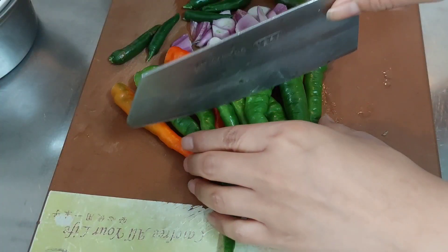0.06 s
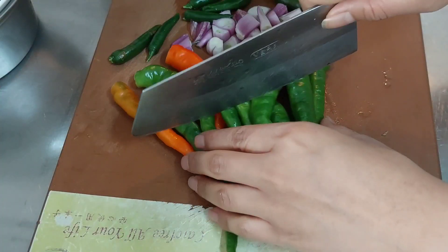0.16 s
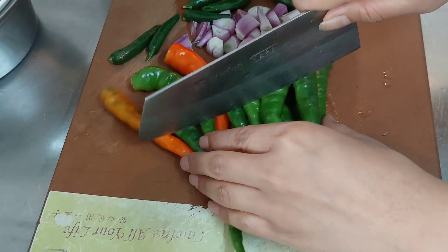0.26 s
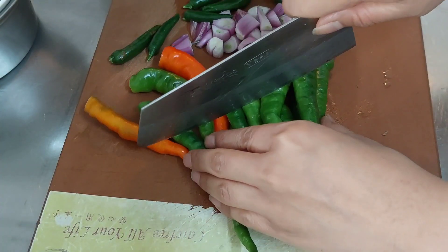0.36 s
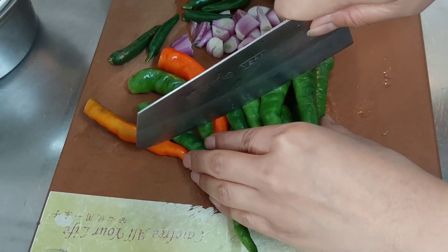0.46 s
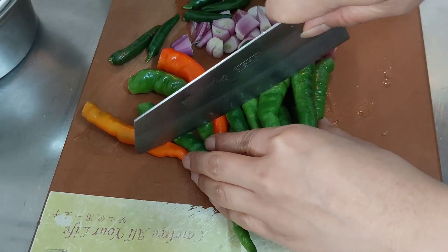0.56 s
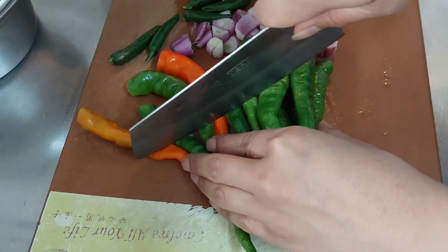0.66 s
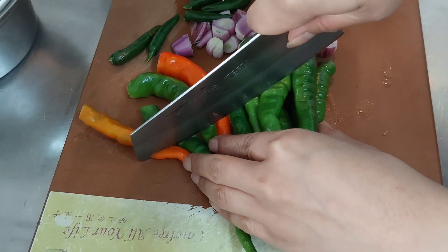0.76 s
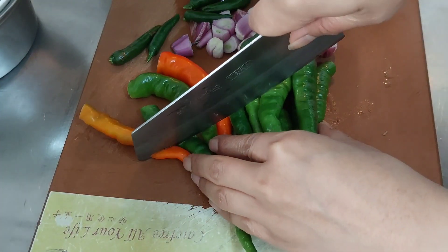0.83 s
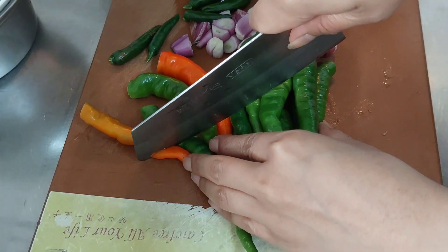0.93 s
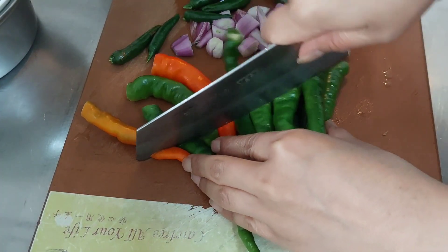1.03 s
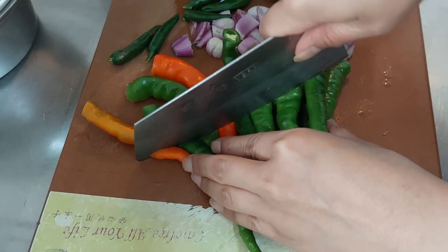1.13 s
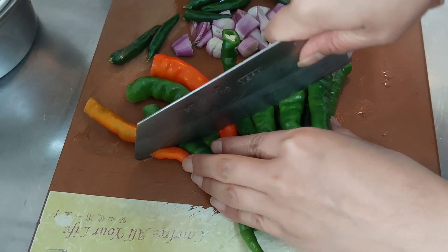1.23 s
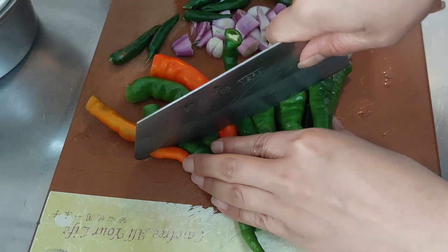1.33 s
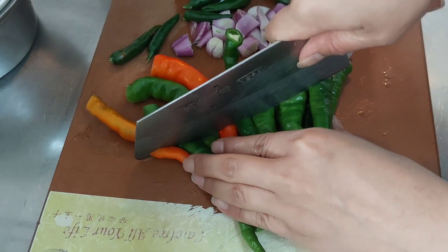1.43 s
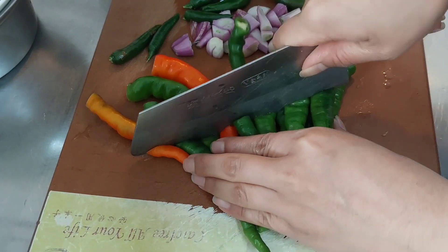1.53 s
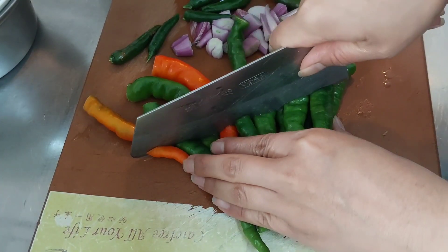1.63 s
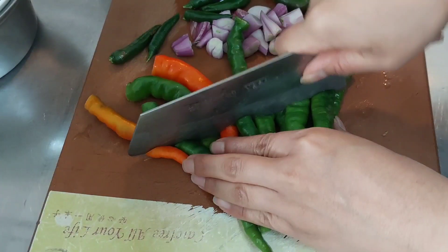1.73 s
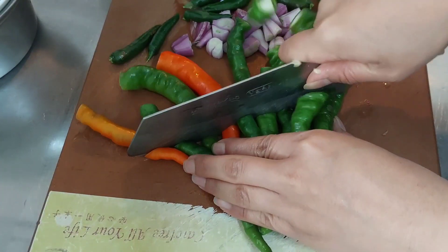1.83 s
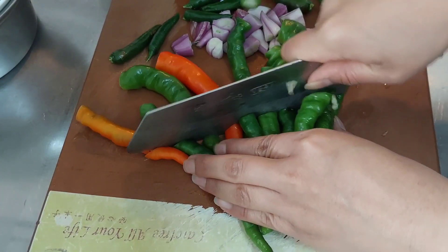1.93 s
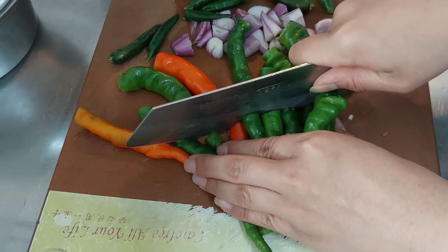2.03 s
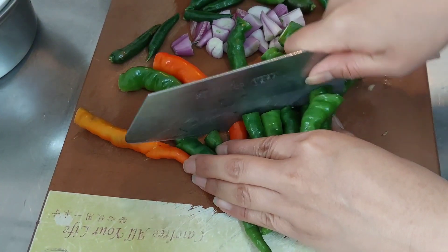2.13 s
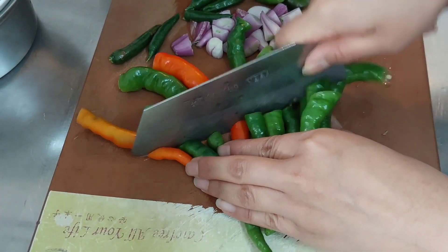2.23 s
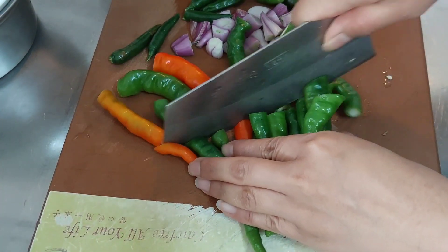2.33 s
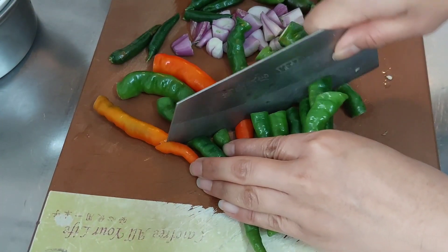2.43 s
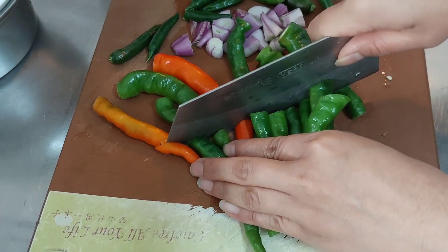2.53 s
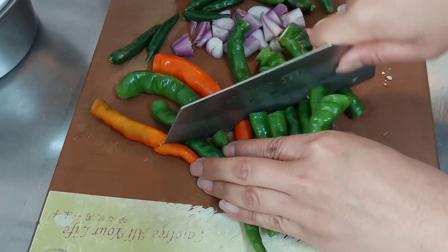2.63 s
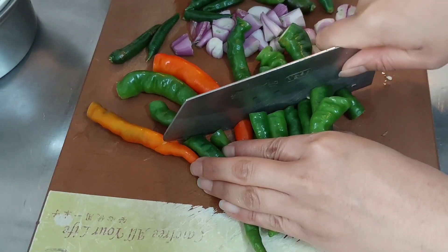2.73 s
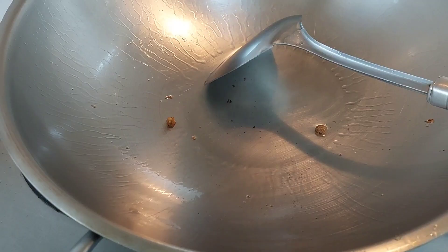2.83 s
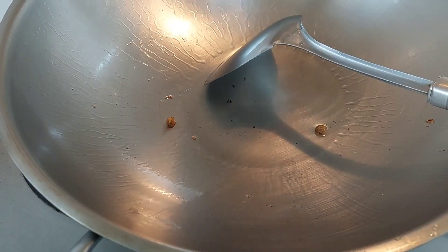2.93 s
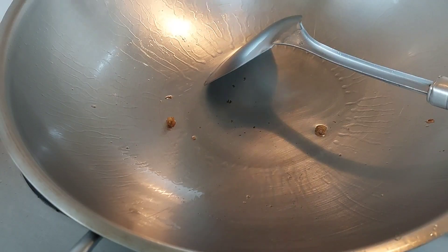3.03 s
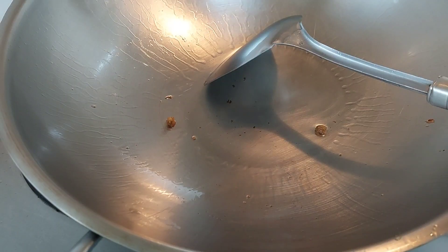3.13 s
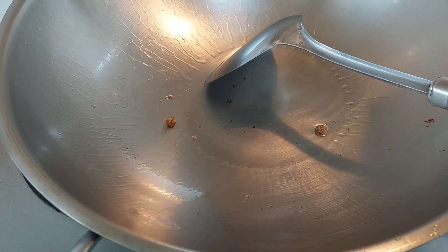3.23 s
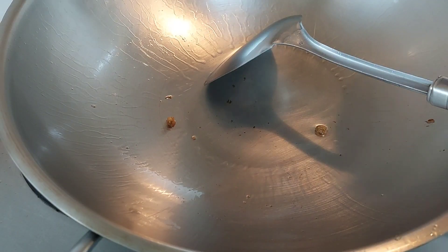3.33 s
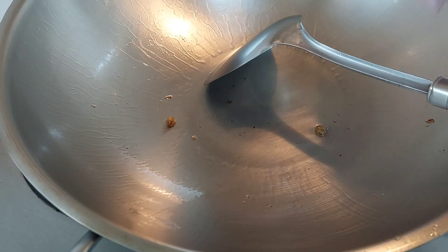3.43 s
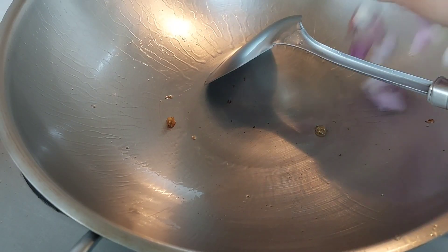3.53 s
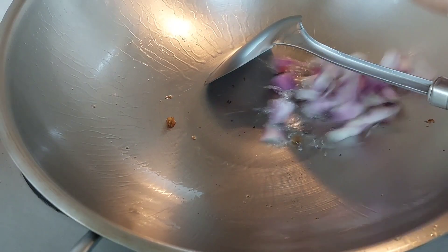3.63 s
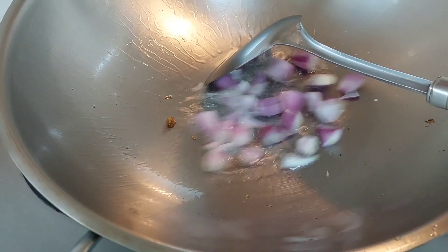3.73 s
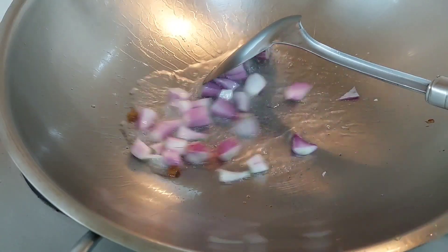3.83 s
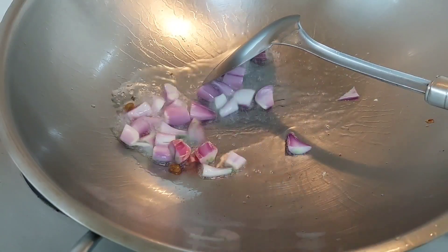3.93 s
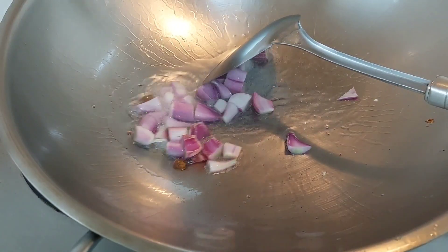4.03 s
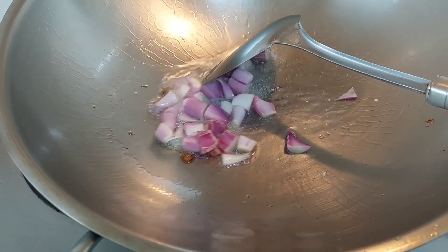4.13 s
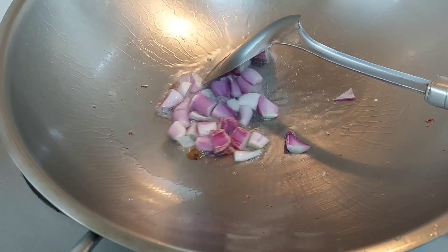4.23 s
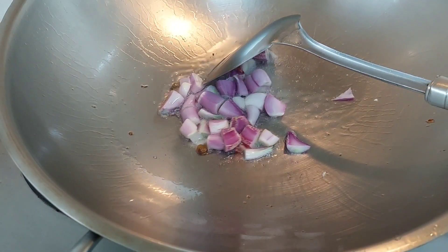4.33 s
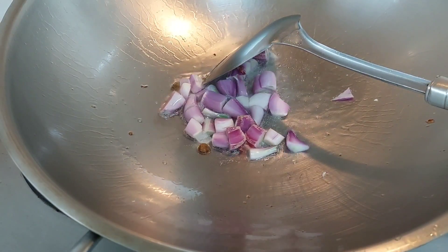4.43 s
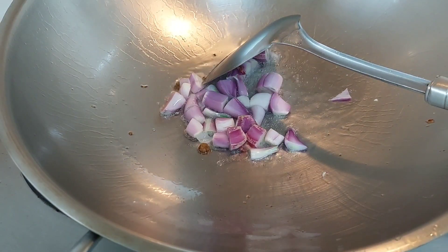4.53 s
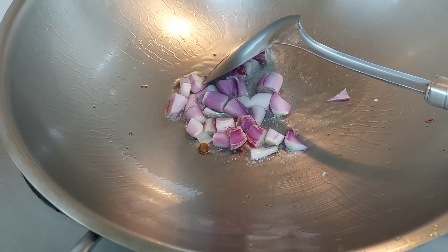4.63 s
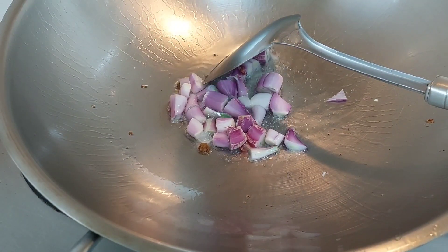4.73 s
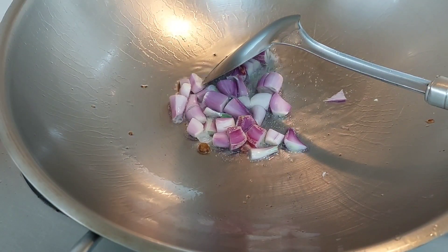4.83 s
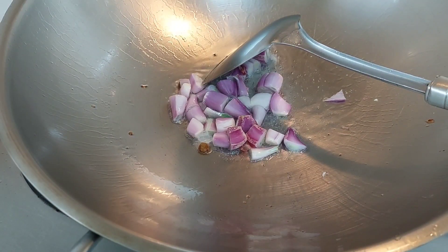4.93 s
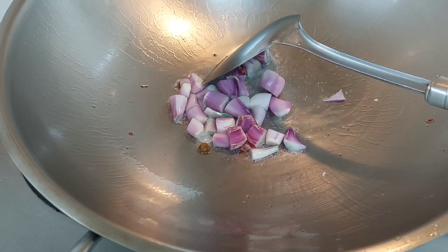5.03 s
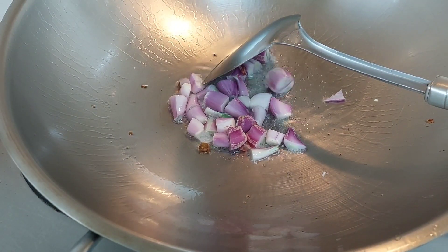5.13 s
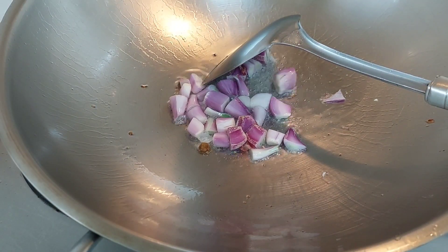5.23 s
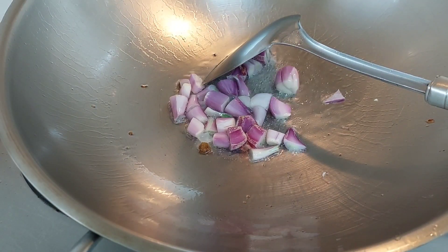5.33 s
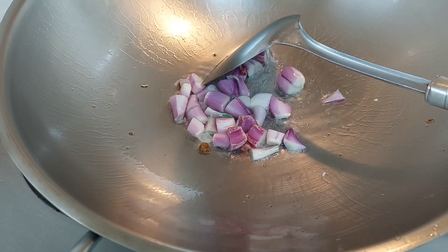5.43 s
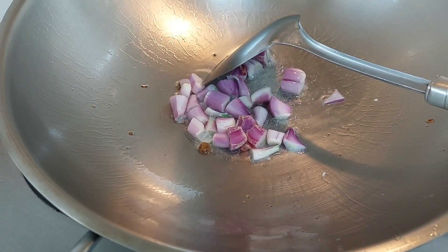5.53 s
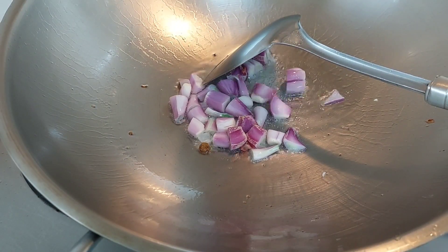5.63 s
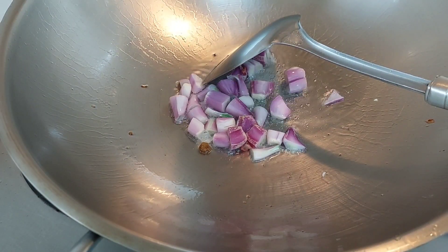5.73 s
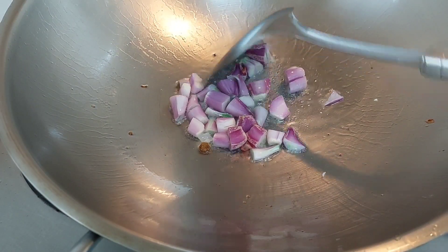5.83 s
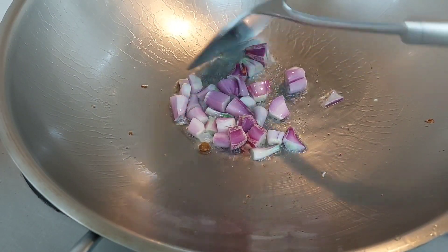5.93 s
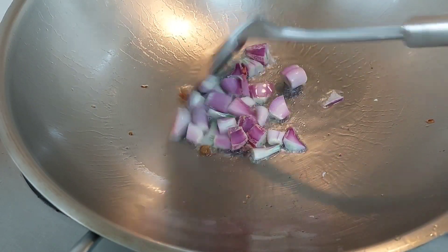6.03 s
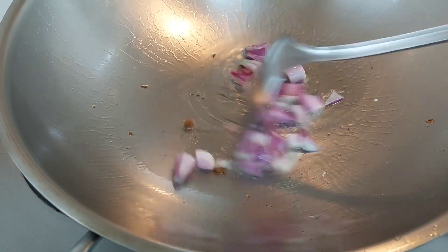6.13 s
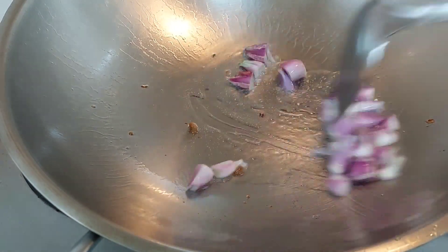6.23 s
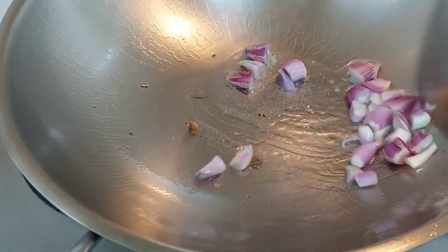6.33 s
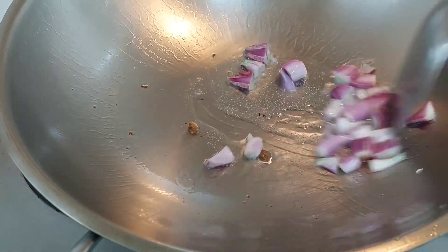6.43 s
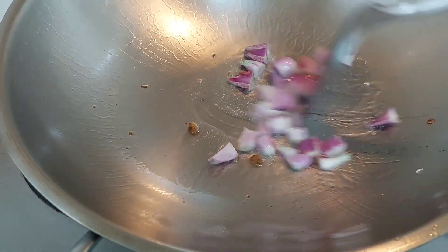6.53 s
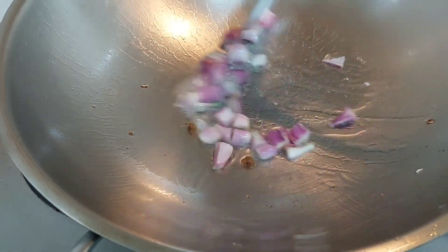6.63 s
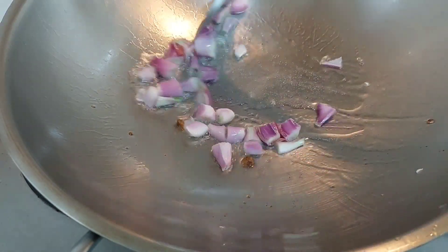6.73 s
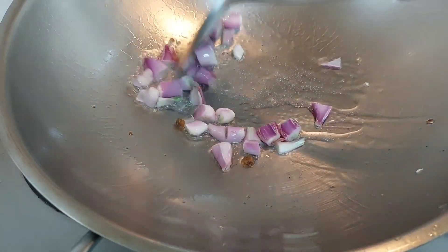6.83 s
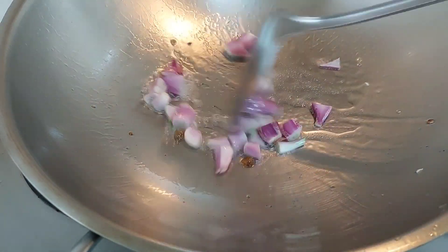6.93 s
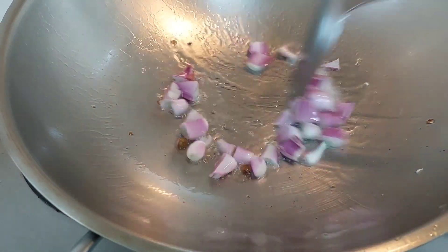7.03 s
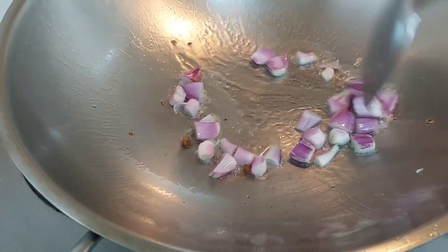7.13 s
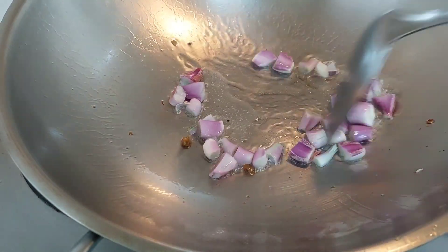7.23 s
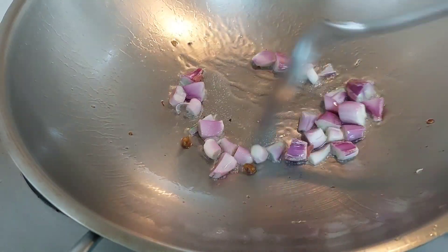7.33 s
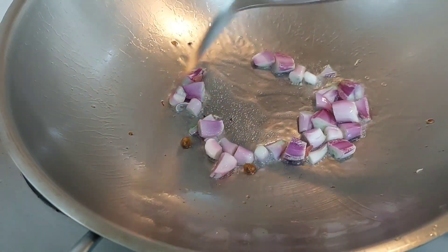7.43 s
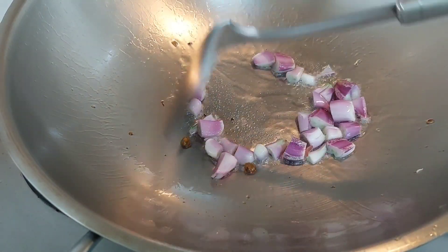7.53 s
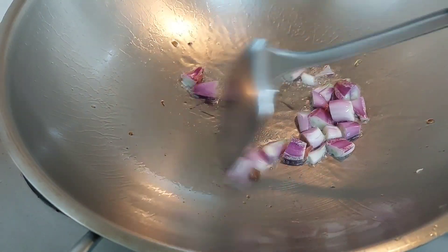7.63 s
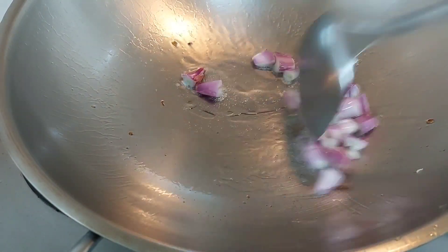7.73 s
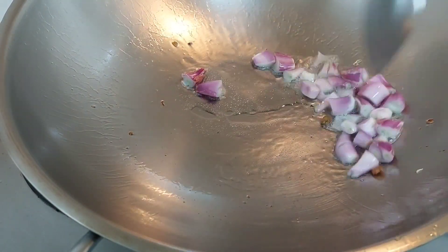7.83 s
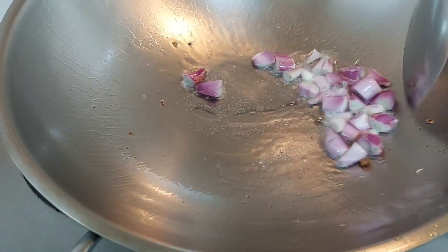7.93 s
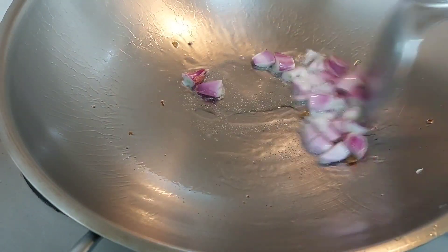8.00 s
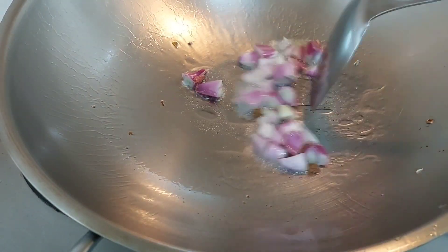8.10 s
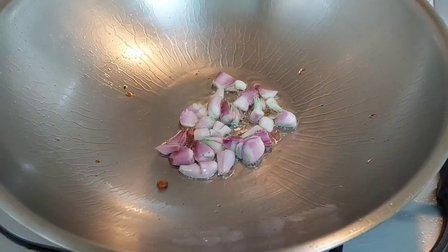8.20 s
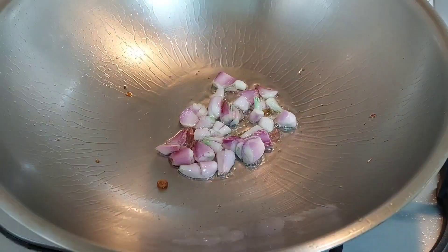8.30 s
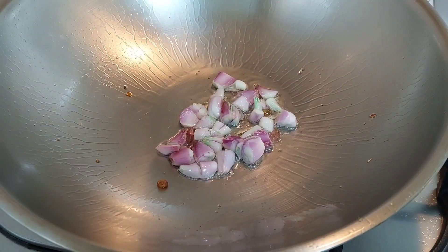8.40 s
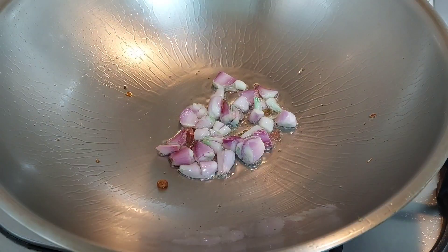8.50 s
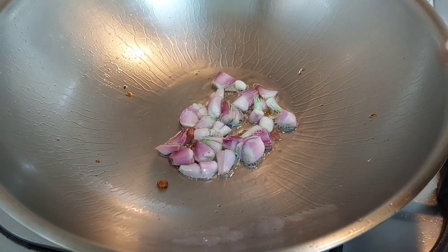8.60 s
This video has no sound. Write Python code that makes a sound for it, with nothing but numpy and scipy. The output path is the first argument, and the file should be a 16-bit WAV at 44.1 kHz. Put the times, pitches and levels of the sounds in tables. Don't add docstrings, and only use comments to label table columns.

```python
import sys
import numpy as np
from scipy import signal
from scipy.io import wavfile
from scipy.ndimage import uniform_filter1d

SR = 44100
rng = np.random.default_rng(int(sys.argv[2]) if len(sys.argv) > 2 else 0)


def log_audio(samples):
    frames = np.atleast_2d(samples).T
    limited = np.clip(frames, -1, 1)
    pcm = np.round(limited * 32767).astype(np.int16)
    wavfile.write(sys.argv[1], SR, pcm)


def gain_from_db(level_db):
    decades = np.asarray(level_db, float) / 20
    return 10 ** decades


N = 381906


def evened(x):
    return x / np.sqrt(np.mean(x ** 2) + 1e-20)


def add(mix, s, sound):
    part = mix[round(s * SR):][:len(sound)]
    part += sound[:len(part)]


def control(points, column=1):
    rows = np.array(points)
    return np.interp(np.arange(N) / SR, rows[:, 0], rows[:, column])


def swells(events, width_s, column):
    t = np.arange(0, N + 64, 64) / SR
    total = sum(row[column] * np.exp(-((t - row[0]) / width_s) ** 2 / 2) for row in events)
    return np.interp(np.arange(N) / SR, t, total)


def colour(x, points):
    hz = abs(np.fft.fftfreq(4096, 1 / SR))
    f, level_db = np.transpose(points)
    spectrum_db = np.interp(np.log(hz + 1), np.log(f), level_db)
    log_gain = np.log(gain_from_db(np.maximum(spectrum_db, -70)))
    taps = np.fft.ifft(np.exp(np.conj(signal.hilbert(log_gain)))).real[:2048]
    return evened(signal.oaconvolve(x, taps)[:N])


def resonate(x, hz, width_hz):
    r = np.exp(-np.pi * width_hz / SR)
    return evened(signal.lfilter([1, 0, -1], [1, -2 * r * np.cos(2 * np.pi * hz / SR), r * r], x))


def glide(x, hz, width_hz):
    turn = np.exp(2j * np.pi * np.cumsum(hz) / SR)
    r = np.exp(-np.pi * width_hz / SR)
    smoothed = signal.lfilter([1], np.convolve([1, -r], [1, -r]), x / turn)
    return evened((turn * smoothed).real)


def crowd(low_hz, high_hz, level_db, t60, count):
    jitter_hz = (high_hz - low_hz) / count * rng.uniform(-0.48, 0.42, count)
    hz = np.linspace(low_hz, high_hz, num=count) + jitter_hz
    return np.c_[hz, np.full(count, level_db), np.full(count, t60)]


def ring(modes, stretch, spread_db, seconds):
    chance = rng.standard_normal((len(modes), 2))
    hz, level_db, t60 = np.transpose(modes)[:, :, None]
    t = np.arange(round(seconds * SR)) / SR
    decay = np.exp(-t * np.log(1000) / stretch / np.clip(t60, .05, .5))
    waves = decay * np.sin(2 * np.pi * hz * t + 3 * chance[:, 1:])
    strength = gain_from_db(level_db[:, 0] + spread_db * chance[:, 0])
    sound = strength @ waves * np.minimum(t / 0.00042, 1)
    return sound / abs(sound[:1500]).max()


def bursts(per_s, spread_db, tail_s, hiss):
    size = gain_from_db(spread_db * np.minimum(rng.exponential(1, N), 4)) * (rng.random(N) < per_s / SR)
    envelope = signal.lfilter([1], [1, -np.exp(-1 / (tail_s * SR))], size)
    a, b = rng.standard_normal((2, N))
    clumped = envelope * a
    clumped /= np.sqrt(uniform_filter1d(clumped ** 2, 6000) + 1e-9)
    return clumped + hiss * b


def patchy(x, patch_db, bins, frames):
    z = signal.stft(x, nperseg=256)[2]
    field = uniform_filter1d(rng.standard_normal(z.shape), bins, 0)
    field = uniform_filter1d(field, frames, 1)
    return evened(signal.istft(z * gain_from_db(patch_db * evened(field)), nperseg=256)[1][:N])


def clicks(events, cycles, crack, puff, puff_s, boost_db, band_hz):
    tones, wide = np.zeros(N), np.zeros(N)
    t = np.arange(2000) / SR
    for s, peak_db, hz in events:
        peak = gain_from_db(peak_db + boost_db)
        add(tones, s, peak * np.sin(2 * np.pi * hz * t) * np.exp(-t * hz / cycles))
        spray = rng.standard_normal(2000) * (np.exp(-t / 0.00016) + puff * np.exp(-t / puff_s))
        add(wide, s, peak * crack * spray)
    band = signal.butter(2, band_hz, "bandpass", fs=SR, output="sos")
    return tones, signal.sosfilt(band, wide)


# f/Hz, t60/s
KITCHEN_T60 = [(250, 0.4), (660, 0.26), (1740, 0.39), (4590, 0.32)]


def room(x):
    taps = np.zeros(SR // 2)
    at = np.arange(120, SR // 2 - 20, 20)
    taps[at + rng.integers(0, 20, len(at))] = rng.choice([-1., 1.], len(at))
    hz, t, z = signal.stft(taps, SR, nperseg=128)
    t60 = np.clip(np.interp(hz, *np.transpose(KITCHEN_T60)), .1, .8)
    tail = signal.istft(z * gain_from_db(-60 * t / t60[:, None]), SR, nperseg=128)[1]
    return signal.fftconvolve(x, tail / np.linalg.norm(tail))[:N]


# t/s, level/dB
FAN_LEVEL = [(0, -64.5), (2.2, -51), (2.83, -62), (2.84, -65), (3.55, -63.5), (3.75, -45.5), (4.3, -59),
             (4.5, -49), (5.7, -56), (7.0, -47.5), (7.4, -43.5), (7.9, -61), (8.18, -43), (8.21, -71),
             (8.66, -67)]
# f/Hz, level/dB
AIR_SPECTRUM = [(15, -56.5), (25, -37), (49, 1.5), (86, -19), (123, -6), (261, -10), (854, -11.5),
                (1280, -24), (2650, -32.5), (2950, -25.5), (3470, -31.5), (15700, -43.5)]
# t/s, level/dB
AIR_LEVEL = [(0, -66), (.7, -58.5), (2.84, -61), (3.3, -63), (3.7, -60.5), (8.18, -49), (8.2, -64.5),
             (8.66, -66.5)]
# t/s, level/dB
WHINE_SWELL = [(0, -12), (.35, -4), (.55, 7), (.8, -10), (2.6, -5.5), (2.9, 3), (3.6, 0)]
# t/s, rumble swell level/dB, hum swell level/dB
LEANS = [
    (4.66, 10.5, 1),
    (4.92, 8, 12.5),
    (5.08, 3, 14.5),
    (5.25, 5, 6),
    (5.45, 2, 14),
]


def fan():
    rumble_hz, hum_hz, whine_hz, whine_db = 58.4, 114, 2895, -77.5
    lean_s = 0.066
    a, b, c, d = rng.standard_normal((4, N))
    t = np.arange(N) / SR
    rumble = resonate(resonate(a, rumble_hz, 28), rumble_hz, 35)
    waver = resonate(resonate(b, 108, 30), 108, 30)
    hum = evened(np.sin(2 * np.pi * hum_hz * t) + .4 * waver)
    air = gain_from_db(control(AIR_LEVEL)) * colour(c, AIR_SPECTRUM)

    drift, swell, other = (np.interp(t, np.arange(90) / 10, v) for v in rng.standard_normal((3, 90)))
    whine_level_db = whine_db + control(WHINE_SWELL)
    whine = gain_from_db(whine_level_db + 4.5 * swell) * glide(d, whine_hz + 60 * drift, 90)
    whine += gain_from_db(whine_level_db - 5 + 4 * other) * glide(d, 1.08 * whine_hz + 35 * other, 90)

    fan_db = control(FAN_LEVEL)
    rumble_db = fan_db + swells(LEANS, lean_s, column=1)
    hum_db = -21 + 0.67 * fan_db + swells(LEANS, lean_s, column=2)
    return gain_from_db(rumble_db) * rumble + gain_from_db(hum_db) * hum + air + whine


# f/Hz, level/dB, t60/s
BOARD_MODES = [(207.6, -0.5, 0.27), (339, -1, 0.56), (426, -4, 0.11), (514, -5.5, 0.3), (575, -3.5, 0.6),
               (634, -13, 0.44), (785, -2.5, 0.27), (875, -19, 0.34), (1043, -17.5, 0.2),
               (1260, -27.5, 0.3), (1490, -13, 0.11)]
# f/Hz, level/dB, t60/s
TABLE_MODES = [(60.4, 5.5, 0.39), (101.8, 1, 0.53)]
# t/s, peak level/dB, table thump level/dB, colour centre f/Hz
BLOWS = [(0.786, -9.5, -19, 750), (0.794, -5.5, -12, 540), (0.829, -9.5, -21, 560),
         (1.164, -15, -40.5, 650), (1.178, -17, -29, 420), (1.6, -18, -17, 404), (1.616, -30, -39.5, 450),
         (1.863, -5, -19, 447), (1.873, -12, -31, 700), (1.889, -11, -18, 650), (2.065, -21, -23, 496),
         (2.732, -39, -27, 400), (2.76, -31, -24, 400), (5.128, -19.5, -45, 800), (5.161, -19, -37, 600),
         (5.197, -45, -24, 500), (5.246, -38, -18.5, 500), (5.294, -15, -46.5, 850), (5.303, -16, -46, 450)]


def blows():
    colour_octaves = 0.79
    out = np.zeros(N)
    modes = np.r_[np.array(BOARD_MODES),
                  crowd(170, 330, -3, .35, count=5),
                  crowd(380, 700, -6, .4, count=12),
                  crowd(700, 1150, -9, .15, count=8)]
    for s, peak_db, thump_db, centre_hz in BLOWS:
        near_db = np.maximum(-6 * (np.log2(modes[:, 0] / centre_hz) / colour_octaves) ** 2, -6)
        coloured = modes + np.outer(near_db, [0, 1, 0])
        add(out, s, gain_from_db(peak_db - 8.5) * ring(coloured, 0.3, 0.55, .3))
        add(out, s, gain_from_db(thump_db - 5.5) * ring(TABLE_MODES, 0.46, 1.5, .4))
    return out


# start t/s, push t/s, crunch level at full push/dB, board buzz level over crunch/dB
STROKES = [(.43, 0.0193, -74, 16), (0.599, 0.17, -50.5, -4.5), (0.784, 0.0096, -32, 4.5),
           (1.062, .02, -54, -8), (1.085, 0.023, -40, 1.5), (1.131, 0.051, -29.5, -5.5),
           (1.29, .05, -49, -1), (1.342, 0.042, -37, -4), (1.565, 0.055, -27, -0.5),
           (1.689, 0.027, -42.5, 3.5), (1.783, 0.028, -32, 1.5), (1.831, 0.046, -18, 1),
           (2.02, 0.041, -25.5, 2), (2.18, 0.1702, -50.5, 11), (2.359, 0.077, -51.5, 7),
           (2.51, 0.045, -56.5, -7), (2.71, 0.042, -27, -0.5), (2.769, 0.013, -32, -0.5)]


def pressure(fall_db_per_s, buzz):
    bite_db, bite_s = -11.5, 0.0014
    tail_db, tail_fall_db_per_s = -6, 171.5
    power = np.zeros(N)
    t = np.arange(SR // 2) / SR
    for s, push_s, level_db, board_db in STROKES:
        after = np.maximum(t - push_s, 0)
        rise = np.minimum(t / bite_s, 1) * gain_from_db(bite_db * np.maximum(1 - t / push_s, 0))
        fall = gain_from_db(-fall_db_per_s * after) + gain_from_db(tail_db - tail_fall_db_per_s * after)
        add(power, s, (gain_from_db(level_db + board_db * buzz) * rise * fall) ** 2)
    return np.sqrt(power) * (np.arange(N) < SHOTS[1][0] * SR)


# f/Hz, level/dB
SKIN_SPECTRUM = [(530, -24), (900, 1.5), (2340, -21.5), (3010, -3), (5100, -9.5), (6480, -7.5),
                 (7660, -10.5), (14300, -16), (15700, -36.5)]


def crunch():
    cells = bursts(per_s=300, spread_db=0.0, tail_s=0.0026, hiss=0.89)
    skins = patchy(colour(cells, SKIN_SPECTRUM), 1.17, bins=6, frames=6)
    tearing = bursts(per_s=220, spread_db=6.0, tail_s=0.0038, hiss=1.0)
    board = evened(sum(gain_from_db(0.5 * db) * resonate(tearing, hz, 120) for hz, db, _ in BOARD_MODES))
    return (gain_from_db(-8.0) * pressure(454.5, buzz=False) * skins
            + gain_from_db(-7.5) * pressure(256, buzz=True) * board)


# t/s, peak level/dB, ring f/Hz
SNAPS = [(0.4454, -43.5, 2980), (0.7178, -49, 3570), (0.7876, -23, 3660), (1.0824, -27, 6000),
         (1.0904, -21, 6100), (1.1184, -18.5, 5600), (1.1372, -22, 5380), (1.1585, -32, 5900),
         (1.1732, -13, 3320), (1.342, -17.5, 4120), (1.366, -23.5, 7100), (1.3902, -18, 6400),
         (1.5635, -29.5, 3180), (1.5881, -10.5, 6700), (1.6158, -25.5, 2960), (1.711, -31, 3780),
         (1.7835, -23, 6300), (1.8088, -5.5, 6860), (1.864, -13.5, 3000), (1.875, -7.5, 4040),
         (1.8895, -10.5, 3300), (2.0218, -30, 2070), (2.0647, -11.5, 6700), (2.2914, -32, 3360),
         (2.381, -31, 3780), (2.5074, -45, 3500), (2.567, -42, 6550), (2.5403, -36.5, 3200),
         (2.5544, -41, 3100), (2.6896, -38.5, 3120), (2.7095, -28, 3330), (2.734, -12, 3540)]


def snaps():
    return clicks(SNAPS, cycles=5.2, crack=0.69, puff=0.37, puff_s=0.0044, boost_db=-6.5,
                  band_hz=[2600, 14500])


# f/Hz, level/dB, t60/s
WOK_MODES = [(485, -8, .2), (1292, -7, .25), (1567, -10, .2), (2112, -6, .3), (3052, 3, .3),
             (3797, -1, .27), (3989, 1, .25), (4764, -5, .2), (5139, -1, .2), (5398, 0, .26),
             (5809, -3, .15), (6900, -3, .26), (8816, -1, .3), (10627, 3, .25)]
# f/Hz, level/dB, t60/s
BOTTOM_MODES = [(478, 1, 0.15), (548, -0.5, 0.14), (625, 1, .13), (800, -1, .15), (920, -7, .12),
                (1179, -0.5, 0.24), (1270, -9, .2), (2020, -19, 0.26)]
# f/Hz, level/dB, t60/s
BLADE_MODES = [(1262, -3, .22), (1356, -1, 0.2), (1560, -2, .2), (1710, -9, .2), (1888, -4, 0.16),
               (2287, -12, .18), (3260, -3, .12), (3819, -6, .1), (4650, -7, .18), (5280, -7, .18),
               (8400, -9, .15), (10550, -2, .17)]
# f/Hz, level/dB, t60/s
WALL_MODES = [(230, -17.5, 0.14), (520, -7.5, 0.16), (1295, -9, 0.28), (1610, -5, 0.11), (2090, -1, 0.17),
              (3020, -5, .1), (3860, 6, .1), (4764, -2, 0.18), (5150, -5, .1), (6200, -9, 0.16),
              (7050, -6, 0.089), (10600, -5, .07)]
# t/s, peak level/dB, ring time factor
DROPS = [
    (3.616, -48, 0.6),
    (3.648, -28.5, 0.74),
    (3.672, -32, 0.86),
    (3.702, -27, 0.62),
    (3.735, -38, 0.8),
]
# t/s, peak level/dB, ring time factor
BLADE_HITS = [
    (6.5716, -17, .6),
    (7.0461, -12, 0.59),
]
# t/s, peak level/dB, ring time factor
WALL_HITS = [
    (7.696, -8, 0.92),
]
# t/s, peak level/dB, ring time factor
RIM_HITS = [
    (8.0655, -11, .55),
    (8.0718, -7, .6),
]


def clangs():
    out = np.zeros(N)
    parts = ((BOTTOM_MODES, DROPS), (BLADE_MODES, BLADE_HITS), (WALL_MODES, WALL_HITS), (WOK_MODES, RIM_HITS))
    for modes, hits in parts:
        for s, peak_db, stretch in hits:
            add(out, s, gain_from_db(peak_db) * ring(modes, stretch, 1.5, .3))
    return out


# t/s, peak level/dB, colour centre f/Hz, colour width/octaves, contact t/s
SCRAPES = [(5.732, -27, 2180, .7, 0.011), (5.772, -27, 3600, 0.23, 0.0087), (5.81, -33, 1400, 0.43, 0.006),
           (6.03, -25, 3940, .17, 0.013), (6.107, -20, 3370, 0.15, 0.03), (6.12, -22, 4430, 0.11, 0.03),
           (5.961, -37.5, 500.5, 0.193, 0.025), (6.105, -34.5, 498, 0.22, 0.025),
           (6.109, -22, 2205, .9, 0.043), (6.575, -10.5, 5270, 0.94, 0.0098),
           (7.046, -12.5, 1600, 0.45, 0.0074)]
# t/s, peak level/dB, colour centre f/Hz, colour width/octaves, ring time factor
KNOCKS = [(5.632, -20, 993, 2.9, 0.54), (5.632, -21.5, 3600, .37, 0.33), (6.572, -14, 1460, 0.42, 0.78),
          (6.572, -21, 3110, 0.6, 0.27), (6.758, -17.5, 2800, 0.94, 0.97), (6.966, -17.5, 4000, 0.77, 0.31),
          (7.047, -12, 3800, .99, 0.606), (7.173, -17.5, 1510, 2.3, 0.61), (7.546, -14, 3498, 4.1, 0.45),
          (7.695, -14, 685, 0.8, 0.32), (7.695, -6.5, 2120, 1.11, 0.53), (7.696, -5, 7140, 3.94, 0.61),
          (7.885, -19, 2470, 0.4, 0.59), (8.065, -9, 1501, 1.08, 0.67), (8.067, -3.5, 3715, 0.82, 0.68),
          (8.07, -6.5, 9374, .8, 0.6), (6.572, -28.5, 502, 0.54, 0.78)]
# t/s, peak level/dB, colour centre f/Hz, colour width/octaves, ring time factor
TICKS = [(5.2935, -18, 930, .7, 0.43), (5.129, -22.5, 930, 0.63, 0.33), (3.808, -16, 2300, 0.57, 0.33),
         (3.8675, -11, 2600, 0.37, .5), (3.884, -12, 1930, 0.37, .4), (4.562, -16.5, 3360, 0.42, 0.45),
         (7.325, -24, 3700, 0.42, .25), (7.573, -22, 3000, 0.35, 0.28), (7.654, -21, 4000, .5, .25),
         (5.001, -15, 4900, 0.47, 0.24), (4.438, -18, 925, 1.153, 0.61), (6.281, -16, 1130, 0.98, 0.63),
         (6.512, -28, 3960, 0.59, 0.2), (6.842, -10.5, 3550, 0.25, 0.16), (7.111, -17, 1000, 1.55, 0.207)]


def spatula():
    scrape_ring, knock_s, tick_s = 0.42, 0.0054, 0.0011
    known = np.array(WOK_MODES) * [1, .6, 1] + [0, 1.5, 0]
    dense = crowd(451, 13500, -0.4, 0.11, count=170)
    out = np.zeros(N)
    t = np.arange(3500) / SR
    touches = [(*row, scrape_ring) for row in SCRAPES]
    touches += [(*row[:-1], knock_s, row[-1]) for row in KNOCKS]
    touches += [(*row[:-1], tick_s, row[-1]) for row in TICKS]
    for s, peak_db, centre_hz, octaves, contact_s, stretch in touches:
        modes = np.r_[known + [0, 30 * (min(stretch, 1.1) - .95), 0], dense]
        near_db = -6 * (np.log2(modes[:, 0] / centre_hz) / max(octaves, .1)) ** 2
        modes = (modes + np.outer(near_db, [0, 1, 0]))[near_db > -30]
        rise_s = 0.00044 + 25 * contact_s ** 2
        envelope = np.minimum(t / rise_s, 1) * np.exp(-(t / contact_s) ** 1.34 / 2)
        contact = rng.standard_normal(len(t)) * envelope
        contact[0] = np.linalg.norm(contact) * 1.73 * min(knock_s / contact_s, 1) ** 2
        knock = signal.fftconvolve(ring(modes, stretch, 1.5, .2), contact)
        loud_part = knock[:round((.004 + 2 * contact_s) * SR)]
        add(out, s, gain_from_db(peak_db - 0.5) * knock / (3 * np.std(loud_part)))
    return out


# t/s, level/dB, resonance f/Hz
JET = [
    (3.5, -83, 6310),
    (3.58, -63, 6500),
    (3.64, -69, 6500),
    (3.742, -25.5, 6840),
    (3.95, -20.5, 7774),
    (4.15, -25, 8100),
    (4.5, -39, 8530),
]


def jet():
    s, level_db, hz = np.transpose(JET)
    t = np.arange(N) / SR
    hiss = bursts(per_s=300, spread_db=2.5, tail_s=.004, hiss=1.1)
    jet_db = np.interp(t, s, level_db, left=-200, right=-200)
    return gain_from_db(jet_db) * glide(hiss, np.interp(t, s, hz), 2800)


# t/s, peak level/dB, pitch f/Hz
SPITS = [(3.704, -7, 9200), (3.866, 3, 9960), (3.9248, 11, 7470), (3.9484, 10, 7600), (3.9523, 6, 9690),
         (4.0216, 17, 7790), (4.045, 2, 8140), (4.1165, -3, 7820), (4.1584, -7, 8220), (4.167, 1, 8110),
         (4.1964, -10, 8300), (4.2437, 0, 8120), (4.2657, -1, 10300), (4.339, -9, 12600),
         (4.4383, -5, 12200), (4.5674, -18, 10900), (4.744, -5, 10200), (5.0484, -14, 12300),
         (5.2989, -16, 10300), (5.4184, -13, 9790), (5.7514, -8, 7310), (5.7995, -8, 8690),
         (5.9095, -16, 13300), (5.9644, -2, 6100), (6.0487, -9, 9820), (6.161, 3, 10900),
         (6.2404, -5, 5750), (6.3727, 1, 13200), (6.461, 1, 11000), (6.7526, -14, 12400),
         (6.8134, -1, 13000), (6.9356, -14, 10900), (6.9663, -9, 9470), (7.1748, -12, 10900),
         (7.2986, 3, 11000), (7.3007, -11, 10400), (7.3914, -10, 11700), (7.466, -3, 12200),
         (7.549, 5, 10900), (7.5545, 5, 9430), (7.784, -9, 11000), (7.784, -12, 13400), (7.9348, -17, 8120),
         (7.9738, 5, 11700), (8.0534, -13, 6900), (8.1653, 3, 11400), (8.1754, -6, 9200)]


def spits():
    return clicks(SPITS, cycles=3.1, crack=.8, puff=1.2, puff_s=.004, boost_db=-15.5,
                  band_hz=[7000, 14500])


# f/Hz, level/dB
FIZZ_SPECTRUM = [(2350, -41), (4000, -5.5), (6470, 1), (10300, 7), (12600, 4.5), (14500, 3.5), (15300, -13),
                 (15700, -58)]
# f/Hz, level/dB
BUBBLE_SPECTRUM = [(710, -40), (1200, -8), (1560, -1), (1740, -2.5), (6000, -3), (7800, -18), (13200, -120)]
# f/Hz, level/dB
BODY_SPECTRUM = [(150, -54), (250, -16.5), (562, -0.5), (668, -4), (795, 0), (2000, -7.5), (2600, -20.5),
                 (4400, -120)]
# t/s, level/dB
BOIL = [(3.45, -82), (3.644, -69.5), (3.652, -51), (3.72, -37.5), (3.8, -19.5), (4.0, -18.5), (4.3, -22),
        (4.7, -25.5), (5.1, -27.5), (5.6, -30), (5.95, -33.5), (6.3, -30), (6.9, -25.5), (7.6, -28.5),
        (8.18, -29.5), (8.21, -51.5), (8.3, -57), (8.66, -55.5)]
# t/s, fizz surge level/dB, drag on the steel level/dB
TURNS = [(3.655, -1.5, 16.5), (4.85, 0, -2), (5.0, -3, -0.5), (5.3, -2, 3), (5.42, 3, -1.5), (5.65, 2, 0.5),
         (6.08, 0.5, 6.5), (6.2, 4, 3), (6.4, 3.5, 4.5), (6.8, 3, 8.5), (6.95, 2, -1.5), (7.03, 2, 9),
         (7.15, 3, 2), (7.35, 1.5, 5.5), (7.8, 1, 7.5), (8.12, 2.5, 10.5), (8.54, 5, 10)]


def frying():
    turn_s = 0.059
    splash_s, splash_top_db, splash_fall_db_per_s = 3.89, 4, 11.5
    steam = bursts(per_s=450, spread_db=2.2, tail_s=0.002, hiss=1.3)
    drops = bursts(per_s=560, spread_db=-1.5, tail_s=0.0011, hiss=1.0) + 0.38 * steam
    fizz = patchy(colour(steam, FIZZ_SPECTRUM), 1.8, bins=10, frames=8)
    bubbles = patchy(colour(drops, BUBBLE_SPECTRUM), 1.8, bins=4, frames=12)
    steel = evened(sum(resonate(drops, hz, 62) for hz, _, _ in WOK_MODES if hz < 6000))
    drumming = bursts(per_s=150, spread_db=3.0, tail_s=0.0039, hiss=1.0) + 0.33 * drops
    body = colour(drumming, BODY_SPECTRUM)

    boil_db = control(BOIL)
    above_db = boil_db + 25
    surge_db = swells(TURNS, turn_s, column=1)
    drag_db = swells(TURNS, turn_s, column=2)
    from_splash_s = abs(np.arange(N) / SR - splash_s)
    splash_db = np.maximum(splash_top_db - splash_fall_db_per_s * from_splash_s, 0)
    return (gain_from_db(boil_db + surge_db) * fizz
            + gain_from_db(-30 + above_db + 0.095 * drag_db) * evened(bubbles + 0.12 * steel)
            + gain_from_db(-42 + above_db + drag_db + splash_db) * body)


def scene():
    beds = crunch() + frying() + jet() + fan()
    snap_tones, snap_cracks = snaps()
    spit_tones, spit_cracks = spits()
    knocks = blows()
    steel = clangs() + spatula()
    to_room = (snap_tones + spit_tones) / 8 + gain_from_db(-1.5) * snap_cracks + gain_from_db(-2.5) * spit_cracks
    to_room += gain_from_db(-3.5) * knocks + gain_from_db(-1.5) * steel
    direct = snap_tones + snap_cracks + spit_tones + spit_cracks + knocks + steel
    return direct + room(to_room), beds


def roll_off(x):
    return signal.sosfilt(signal.butter(12, 15850, fs=SR, output="sos"), x)


# start t/s, end t/s
SHOTS = [
    (0, 2.836),
    (2.836, 8.18),
    (8.214, 8.7),
]


def record(dry):
    t = np.arange(N) / SR
    events, beds = dry
    wok_start, wok_end = SHOTS[1]
    tail_gone = 1 - ((t > wok_start) & (t < wok_start + .6)) - (t > wok_end)
    open_shot = sum(np.clip(np.minimum(t - a + .001, b - t + .001) / .002, 0, 1) for a, b in SHOTS)
    far = signal.sosfilt(signal.butter(4, 13440, fs=SR, output="sos"), beds)
    mix = events * tail_gone + np.where(t > SHOTS[2][0] - .01, far, beds)
    mix = mix * np.minimum(open_shot, 1)
    band_limit = signal.firwin(767, 15800, window=("kaiser", 8), fs=SR)
    mix = np.clip(signal.oaconvolve(mix, band_limit, "same"), -1, 1)
    return roll_off(mix)


dry = scene()
out = record(dry)
log_audio(out)
```